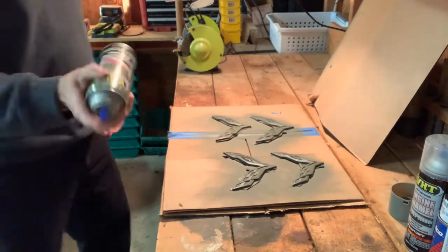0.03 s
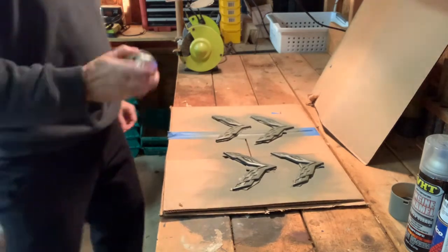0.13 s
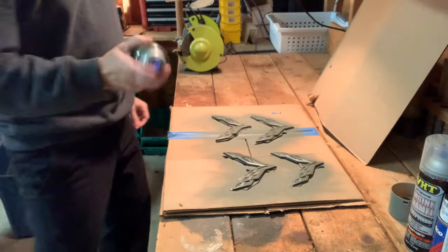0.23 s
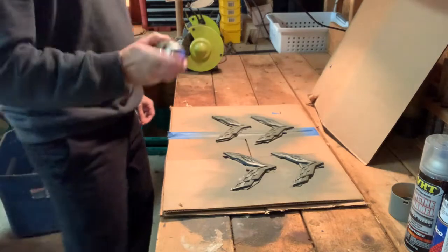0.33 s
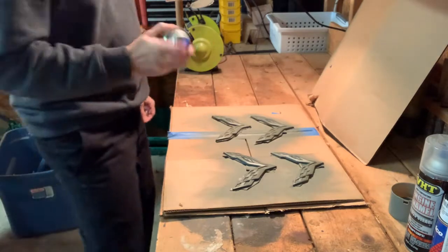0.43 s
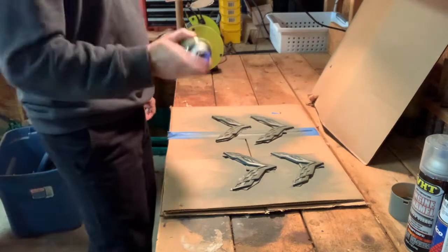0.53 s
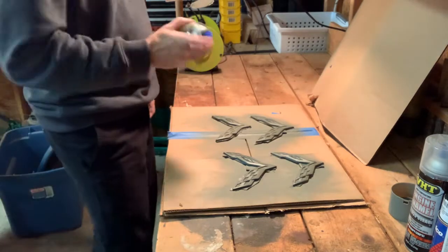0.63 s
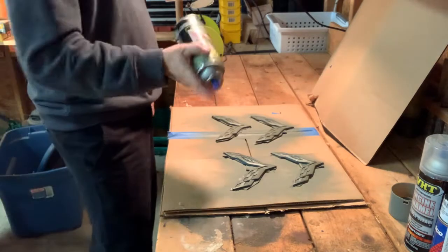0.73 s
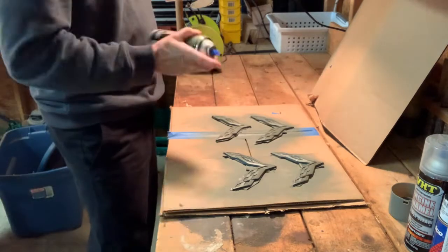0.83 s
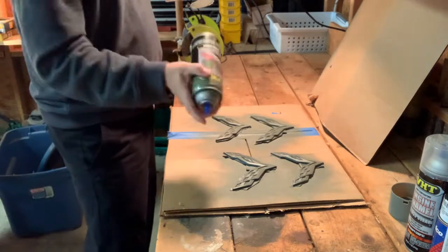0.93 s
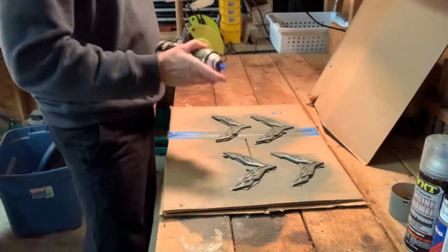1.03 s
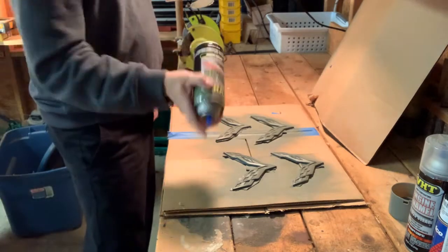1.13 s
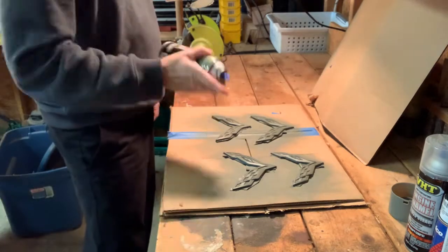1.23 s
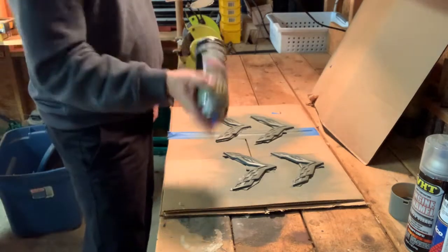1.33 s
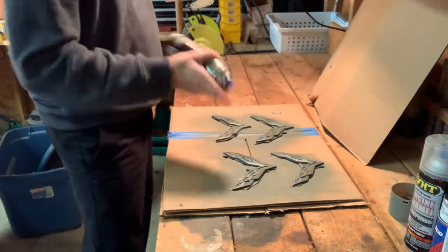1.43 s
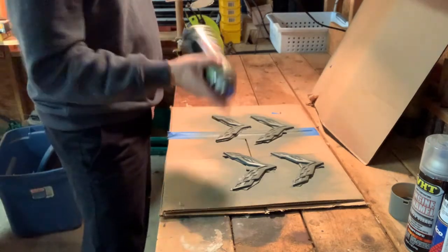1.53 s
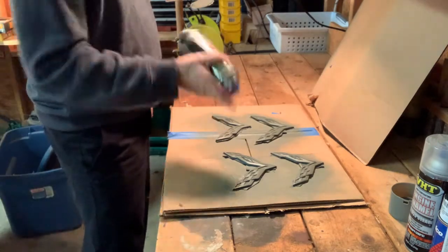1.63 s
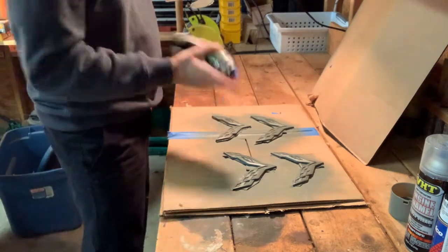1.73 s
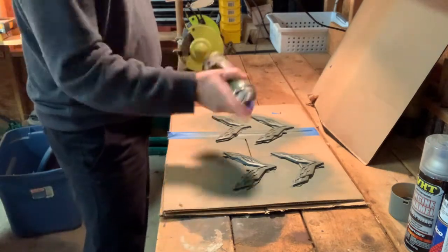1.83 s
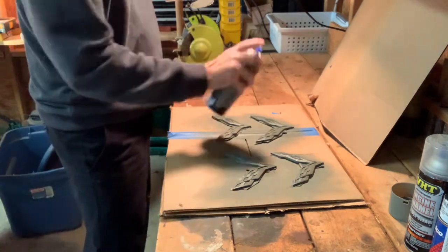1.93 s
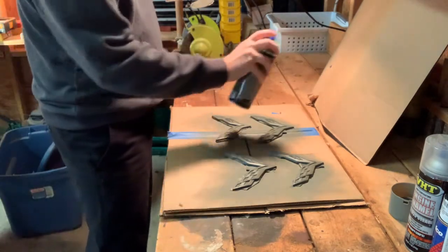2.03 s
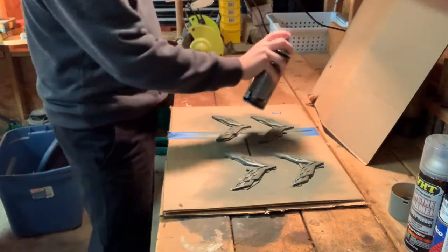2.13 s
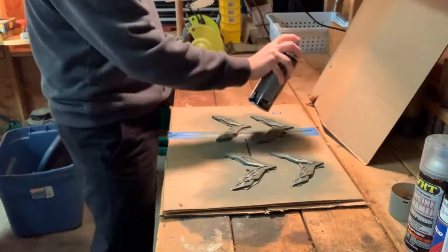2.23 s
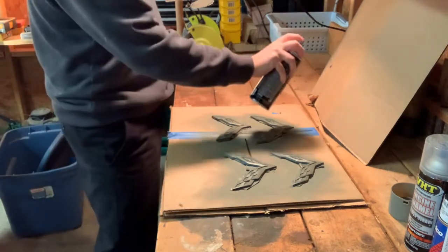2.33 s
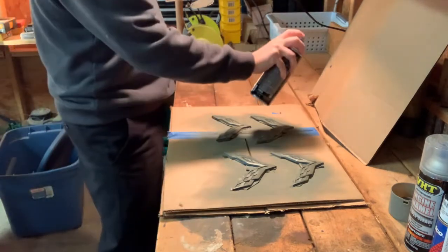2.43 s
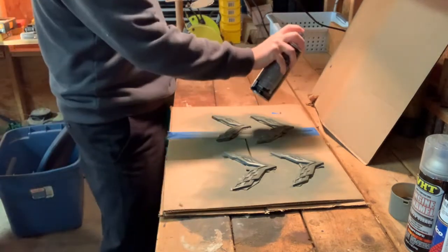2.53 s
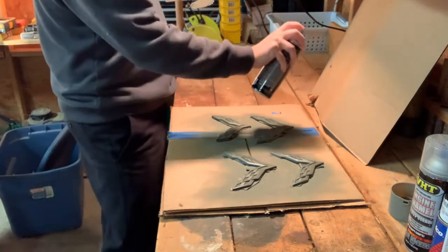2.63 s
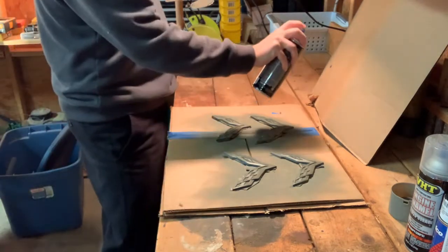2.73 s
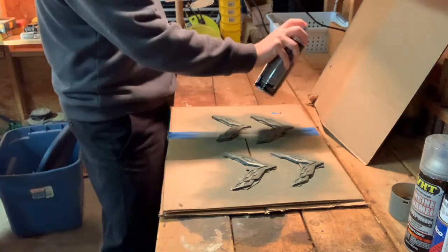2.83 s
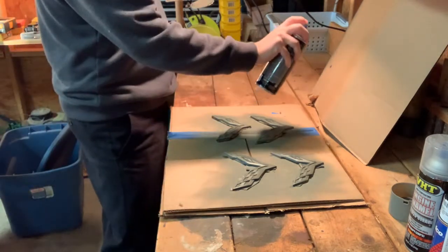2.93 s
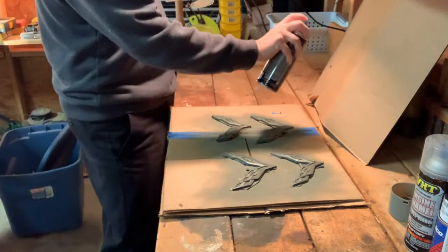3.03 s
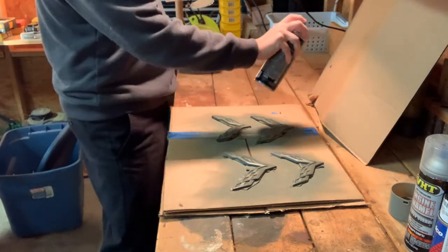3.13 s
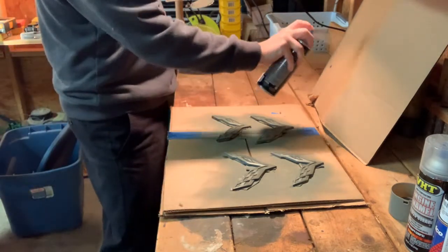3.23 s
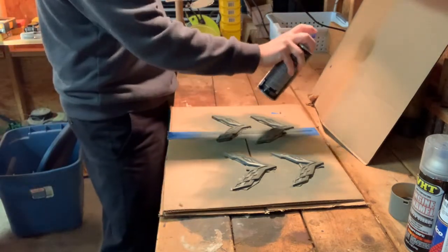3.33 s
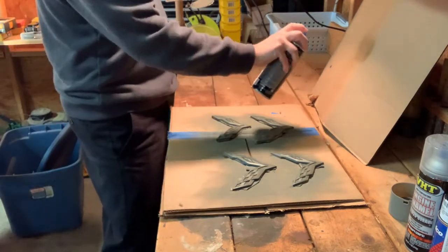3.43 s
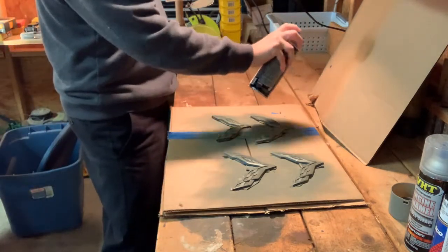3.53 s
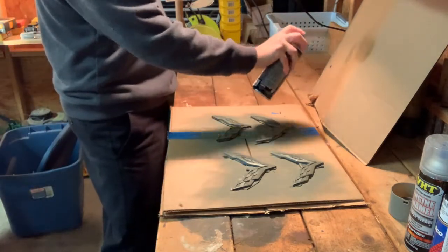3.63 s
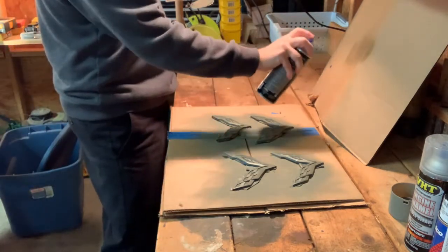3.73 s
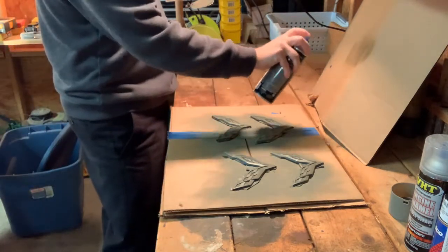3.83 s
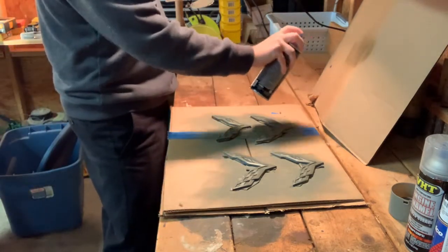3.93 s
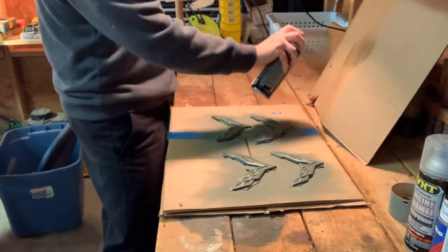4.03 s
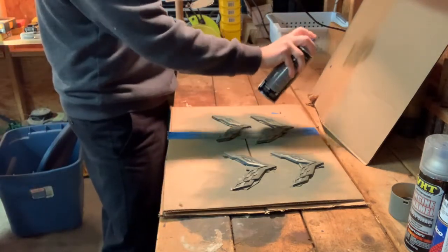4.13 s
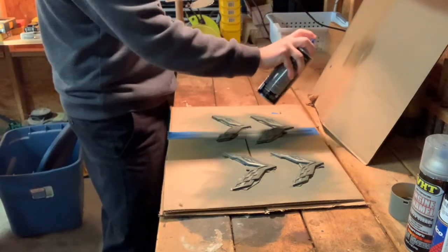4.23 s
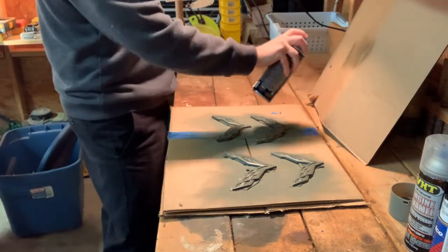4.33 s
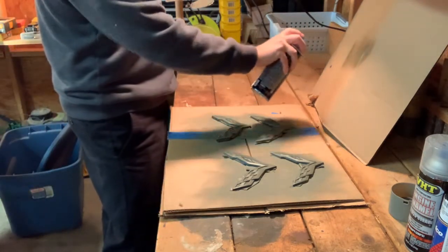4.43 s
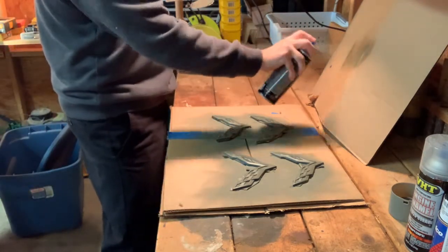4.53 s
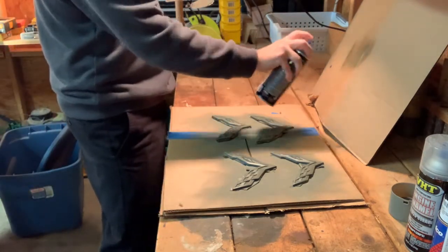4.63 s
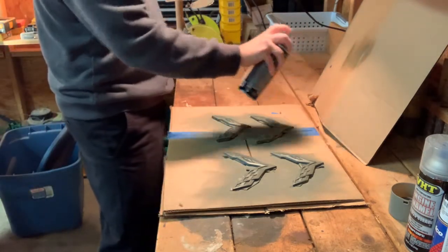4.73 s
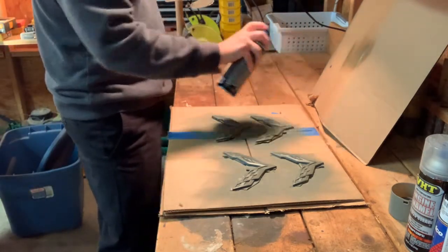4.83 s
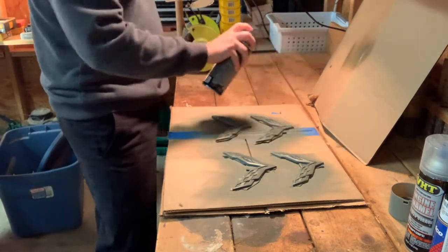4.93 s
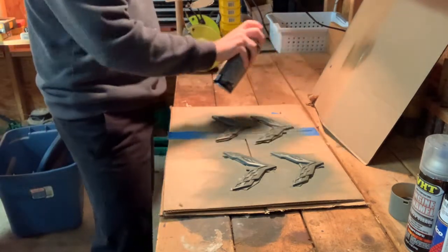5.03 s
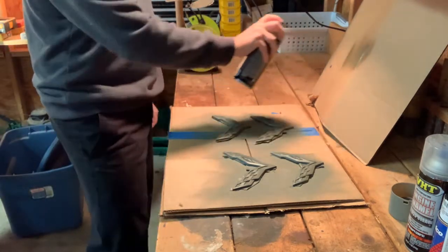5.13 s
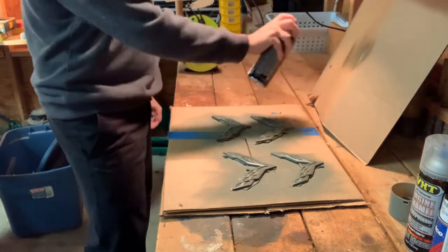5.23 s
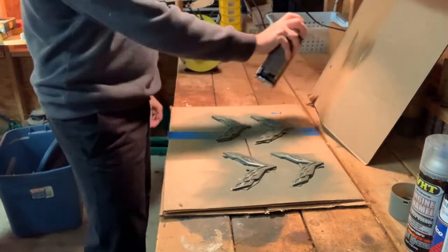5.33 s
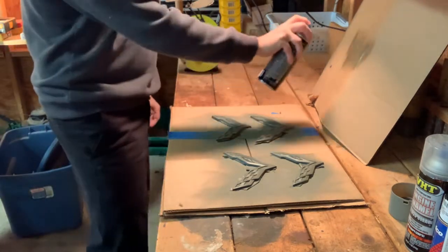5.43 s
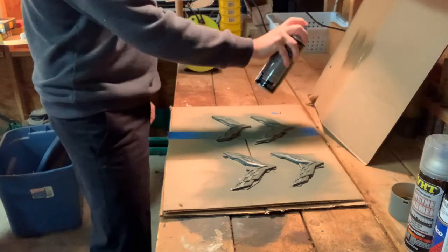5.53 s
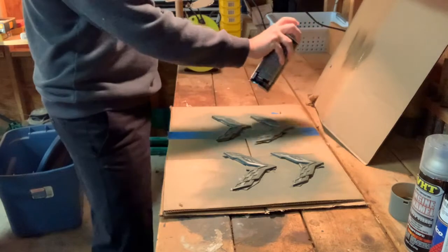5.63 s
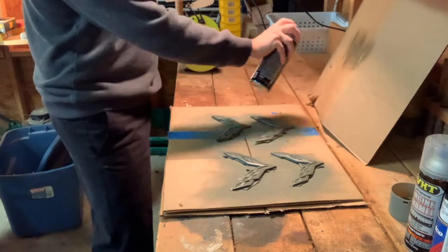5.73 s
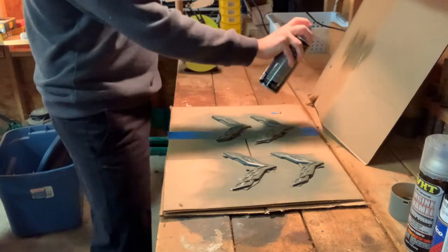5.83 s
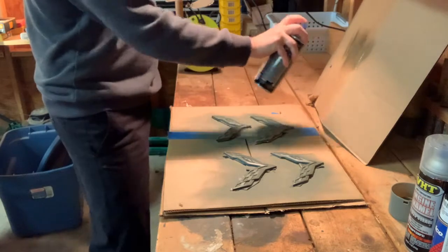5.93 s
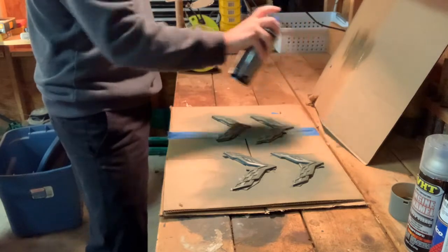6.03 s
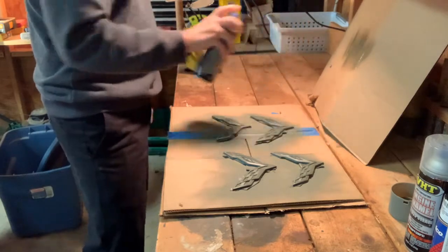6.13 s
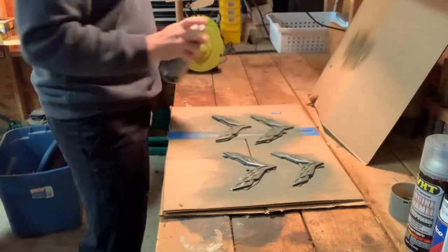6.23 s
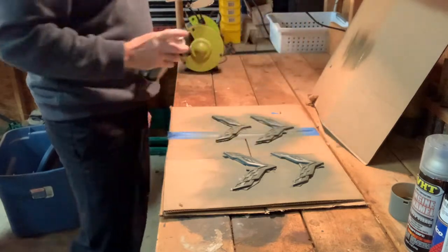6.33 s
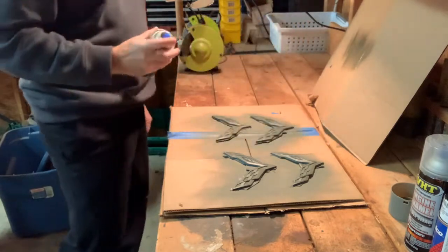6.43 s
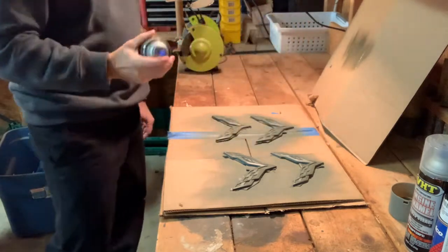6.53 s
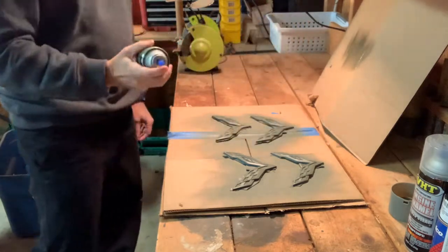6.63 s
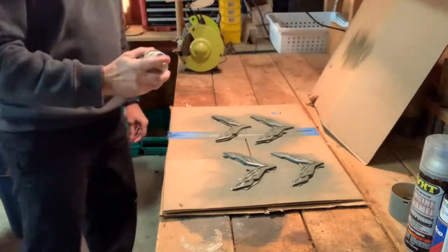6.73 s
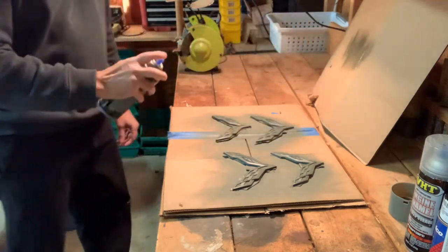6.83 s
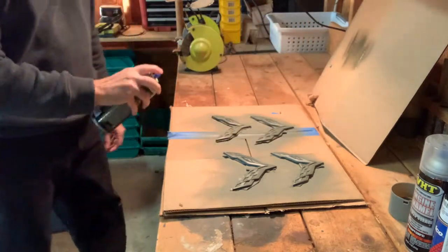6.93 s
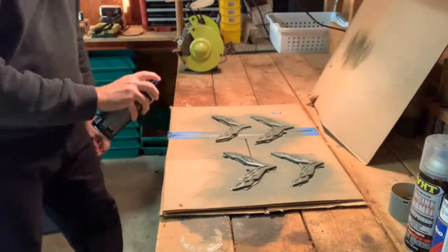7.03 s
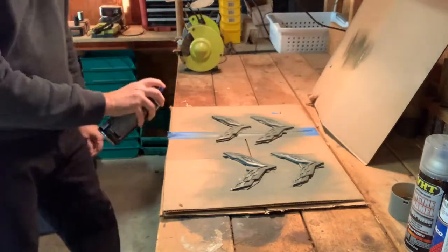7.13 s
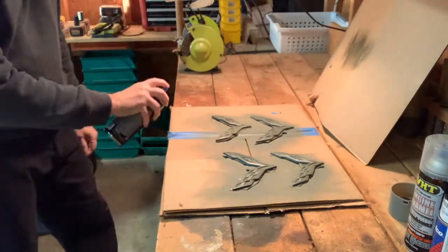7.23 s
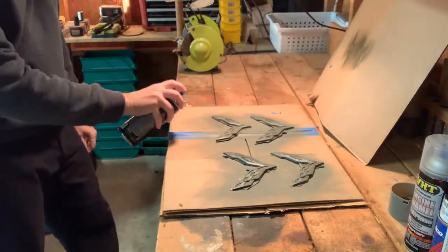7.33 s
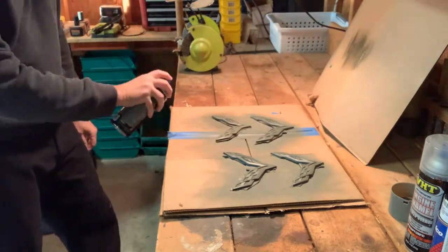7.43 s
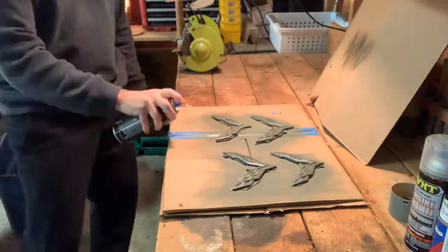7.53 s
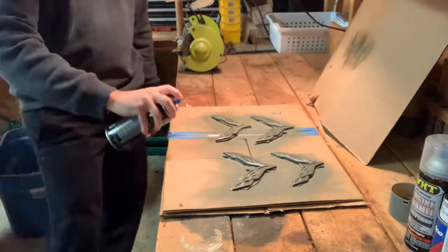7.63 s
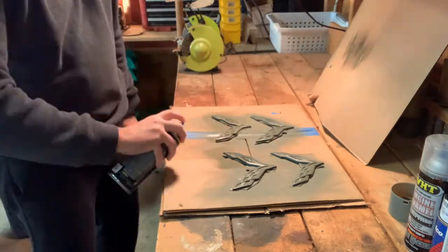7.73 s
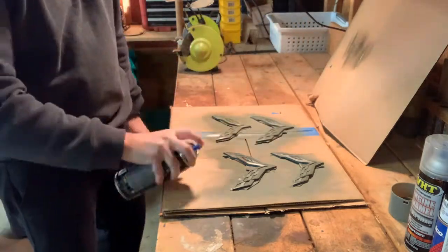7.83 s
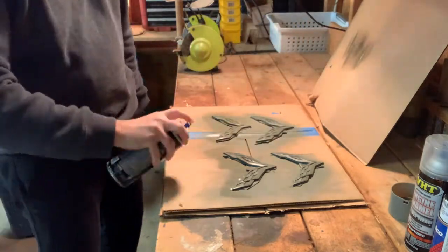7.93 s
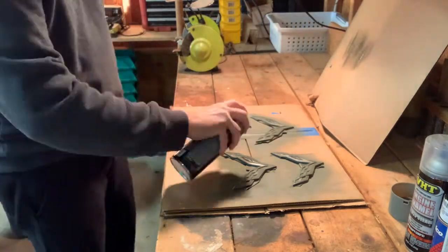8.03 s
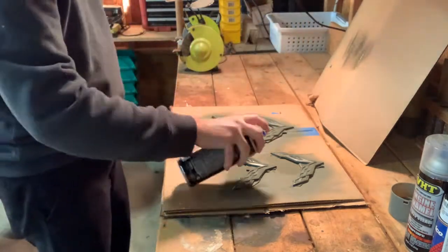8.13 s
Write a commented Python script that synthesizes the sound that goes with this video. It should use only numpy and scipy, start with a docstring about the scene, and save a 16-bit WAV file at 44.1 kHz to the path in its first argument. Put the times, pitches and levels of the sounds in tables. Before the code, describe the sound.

Loud metallic mixing-ball rattle in a paint can, followed by quiet separate spray bursts in a workshop, ending with fluttery fast-forward puffing.

```python
"""A spray can is shaken at a workbench: a ball knocks on its ends (filtered noise and ringing modes), paint sloshes.
From 3.2 to 5.9 s six bursts of shaped noise hiss through the nozzle, with soft resonant swirls of paint.
At 6.6 s a sleeve brushes by; from 6.7 s the can is tipped, the ball clatters and the paint churns again.
By 7.29 s the bench fades out; short noise puffs over a flutter of rumble follow, like spraying in fast-forward.
Up to there lies a low workshop rumble with mains hum."""
import sys
import numpy as np
from scipy import signal
from scipy.fft import rfft, irfft, next_fast_len
from scipy.io import wavfile
from scipy.ndimage import uniform_filter1d, map_coordinates

SR = 44100
rng = np.random.default_rng(int(sys.argv[2]) if len(sys.argv) > 2 else 0)


def to_wav(s):
    """Save 16-bit WAV."""
    ch = np.atleast_2d(s).T  # columns
    pcm = np.round(np.clip(ch, -1, 1) * 32767)  # PCM
    wavfile.write(sys.argv[1], SR, pcm.astype(np.int16))


N = 360738
T = np.arange(N) / SR


# phase by which the left port trails the right: hz, lag_rad
CAN_PHASE = [(0, 0.87), (900, 1.21), (3800, 0.68), (5300, 1.7), (9000, 3.63), (12500, 5.5), (16000, 8.8)]
# extra ring and crack per dB of wall thud
BASE_DB_PER_WALL_DB, CRACK_DB_PER_WALL_DB = 0.5, 0.24
# dome focus at a square hit; dB gained per dB of blow level above it
FOCUS_DB, FOCUS_DB_PER_DB = 3.5, 0.24


def ball(thud_db=-14.0, base_db=-9.0, crack_db=-3.5, level_db=-1.3, echo_db=-8, room_db=-12):
    """The landing spot splits each blow among wall, base and dome; the moving can varies the echoes."""
    direct, echoes = np.zeros(N), np.zeros((2, N))
    for start_s, blow_db, wall_db, extra_base_db, extra_crack_db, dome_hz in blows():
        wall_share_db = thud_db + wall_db
        base_share_db = base_db + extra_base_db + BASE_DB_PER_WALL_DB * wall_db
        crack_share_db = crack_db + extra_crack_db + CRACK_DB_PER_WALL_DB * wall_db
        shares_db = (wall_share_db, base_share_db, 0, crack_share_db)
        focus_db = FOCUS_DB + FOCUS_DB_PER_DB * (blow_db - SQUARE_HIT_DB)
        blow = knock(level_db + blow_db, dome_hz, shares_db, focus_db)
        add(direct, blow, start_s - LEAD_S)
        add(echoes, reflections(blow, decay_s=.008, treble_db=-4), start_s - LEAD_S)
    return ports(direct, CAN_PHASE, pan_db=-1.5) + undb(echo_db) * echoes + undb(room_db) * room(direct)


# throws against an end of the can, relative levels:
# start_s, landing_db, rebound_after_s, rebound_db, dome_hz (favoured), extra_base_db
STROKES = [(0.0294, -19.5, 0.027, -22, 3910, 2.5), (0.1328, -9.5, 0.029, -24, 4374, -1.5),
           (0.2735, -18.5, 0.0041, -31.5, 4276, 3), (0.3915, -17.5, .004, -32.5, 4500, -11),
           (0.4976, -13.5, .0054, -24, 3750, 3), (0.5629, -10.5, 0.018, -12, 3750, -15.5),
           (0.6575, -22, 0.022, -23.5, 3990, 4), (0.7764, -17.5, 0.016, -9.5, 3450, -1.5),
           (0.9191, -16.5, 0.0027, -17.5, 4126, -0.5), (0.993, -9, 0.017, -11.5, 3550, 5.5),
           (1.093, -15.5, 0.017, -14.5, 4100, 3), (1.1988, -13, .024, -10.5, 3550, 0.5),
           (1.3247, -12, .004, -25.5, 3970, 2.5), (1.4215, -20, 0.014, -8, 3232, 4.5),
           (1.5488, -15, 0.0039, -22, 3980, 1.5), (1.6603, -12.5, 0.02, -16.5, 3650, -3),
           (1.7919, -16, 0.0037, -25.5, 3830, -1), (1.8665, -11.5, 0.021, -17, 3800, 1.5)]
# a soft blow lands nearer the wall: wall_db = WALL_DB_PER_DB * (SQUARE_HIT_DB - level_db)
SQUARE_HIT_DB, WALL_DB_PER_DB = -14.5, 0.4428
# paint cushions the landing: less crack than in later contacts
CUSHION_DB = -4
# skitter: typical gap, first bounce re rebound, loss per bounce
SKITTER_GAP_S, SKITTER_DB, SKITTER_LOSS_DB = 0.009, -17.5, 5
# wall graze in flight: mean delay and spread from the landing, mean level, wall share
GRAZE_S, GRAZE_SPREAD_S, GRAZE_DB, GRAZE_WALL_DB = 0.047, 0.01, -39, 13
# loose ball while the can is swung or tipped, relative levels: start_s, level_db, wall_db; # the faint click at
# 2.6655 s is a finger ticking on the nozzle
TAPS = [(0.3145, -35.5, 19), (0.3703, -34, 12.5), (0.7684, -29, 9), (0.8185, -20, -2.5), (0.9672, -33, 19),
        (1.2181, -14.5, -7.5), (1.2685, -34, 15.5), (1.392, -30.5, 13.5), (1.4536, -24, 0),
        (1.614, -34, 18), (1.6387, -29, 7.5), (1.9608, -39, 21), (2.0377, -24.5, 7), (2.091, -27, 5.5),
        (2.1347, -42, 19.5), (2.1656, -36.5, 15.5), (2.178, -32.5, 5), (2.251, -41, 18.5), (2.2676, -41, 5),
        (2.2798, -35.5, 5.5), (2.35, -40.5, 12), (2.4011, -39, 0), (2.4335, -47, 5), (2.4662, -47.5, 3.5),
        (2.6655, -51.5, -11), (2.8749, -70, -1), (3.0445, -67, 1), (6.391, -76, 10), (6.715, -47.5, 13.5),
        (6.7883, -28.5, -2), (6.7935, -30.5, -6), (6.832, -49.5, 13), (6.8443, -37.5, -1), (6.863, -44, -2),
        (6.8964, -29.5, -4.5), (6.9452, -38, -2), (6.977, -40.5, -2.5), (7.0573, -53, 1)]
# dome resonance favoured by a tap; relative spread
TAP_HZ, TAP_SPREAD = 3700, 0.05


def blows(count=2):
    """Thrown ball lands, rebounds, skitters and grazes; a loose ball taps.

    Rows: start_s, level_db, wall_db, extra_base_db, extra_crack_db, dome_hz."""
    rows = []
    for start_s, landing_db, gap_s, rebound_db, dome_hz, base_db in STROKES:
        hits = [(start_s, landing_db, CUSHION_DB), (start_s + gap_s, rebound_db, 0)]
        for k in range(count):
            next_s = hits[-1][0] + SKITTER_GAP_S * np.exp(.3 * rng.standard_normal())
            hits.append((next_s, rebound_db + SKITTER_DB - k * SKITTER_LOSS_DB, 0))
        for hit_s, level_db, crack_db in hits:
            wall_db = WALL_DB_PER_DB * (SQUARE_HIT_DB - level_db)
            rows.append((hit_s, level_db, wall_db, base_db, crack_db, dome_hz))
        graze_s = start_s + GRAZE_S + GRAZE_SPREAD_S * rng.standard_normal()
        graze_db = GRAZE_DB + 2 * rng.standard_normal()
        rows.append((graze_s, graze_db, GRAZE_WALL_DB, 0, 0, dome_hz))
    for start_s, level_db, wall_db in TAPS:
        dome_hz = TAP_HZ * (1 + TAP_SPREAD * rng.standard_normal())
        rows.append((start_s, level_db, wall_db, 0, 0, dome_hz))
    return rows


# nominal can modes, relative levels: pitch_hz, level_db, t60_s
CAN_MODES = [(306, -22, 0.03), (880, -21.5, 0.093), (1293, -13, 0.028), (1480, -16, .07),
             (1800, -19.5, .06), (2130, -1, 0.031), (2267, -14.5, 0.11), (3250, -9.5, .025),
             (3700, -9.5, 0.023), (3966, -10, .025), (4180, -6.5, .025), (4660, -13.5, 0.031),
             (5800, -17, 0.027), (8344, -16.5, .03)]
# outline of the dense, short steel shell resonances: hz, level_db
SHELL = [(120, -51), (280, -17.5), (650, -20.5), (1200, -6), (1700, -14), (2150, -6), (2650, -17),
         (3400, -3.5), (4100, 0), (4900, -10.5), (7000, -6), (9500, -12.5), (12000, -15.5), (16000, -21)]
# bands of wall, base, dome and contact crack: low_hz, high_hz
REGISTERS = [signal.butter(3, edges_hz, "band", fs=SR, output="sos")
             for edges_hz in [(230, 1750), (1750, 2650), (2650, 5300), (5300, 17000)]]
LEAD_S = .01


def knock(dome_db, dome_hz, shares_db, focus_db, shell_s=.0014, shell_db=12, buzz_db=-21, buzz_s=0.015,
          slide_db=-17, slide_s=0.0026, chatter_db=5):
    """The ball skids on the wall from LEAD_S before landing, rings the can and chatters to rest."""
    t = np.arange(SR // 8) / SR - LEAD_S
    after = np.maximum(t, 0)
    hz, db, t60_s = np.transpose(CAN_MODES)[:, :, None]
    detune, strength, turn_rad = rng.standard_normal((3, len(hz), 1))
    # moving paint loads the steel differently at each blow
    mode_gain = undb(db + 2 * strength - 60 * after / t60_s)
    ring = mode_gain * np.sin(2 * np.pi * (hz * (1 + 0.0069 * detune)) * t + 2 * np.pi * turn_rad)
    rebounds = np.minimum(unit(uniform_filter1d(rng.standard_normal(len(t)), size=90)), 2)
    chatter = undb(buzz_db + chatter_db * rebounds) * np.exp(-after / buzz_s)
    slide = undb(slide_db) * np.exp(-abs(t) / slide_s)
    shell = np.where(t < 0, slide, np.exp(-after / shell_s) + chatter)
    blow = ring.sum(0) * (t > 0) + undb(shell_db) * shell * noise(SHELL, size=len(t))
    # the struck spot favours one dome resonance
    blow = blow + undb(focus_db) * signal.lfilter(*signal.iirpeak(dome_hz, 5.5, fs=SR), blow)
    contact = abs(t - .0018) < .0022
    out = np.zeros(len(t))
    for sos, share_db in zip(REGISTERS, shares_db):
        part = signal.sosfilt(sos, blow)
        out += part * undb(dome_db + share_db) / part[contact].std()
    return out


# paint churning, one list while shaken, one while tipped, relative levels: time_s, level_db
CHURN = [
    [(0, -34), (0.3, -45), (0.55, -43), (1.82, -42), (2.12, -53), (2.3, -48.5), (2.45, -55.5), (2.56, -73)],
    [(6.68, -74.5), (6.81, -62), (6.9, -60), (7.01, -67), (7.1, -76)],
]
# splashes heard through the shell: hz, level_db
SPLASH = [(150, -31), (500, -15.5), (900, -4.5), (1500, -2), (2150, 2), (2800, -8), (4100, -0.5),
          (5200, -9.5), (9000, -16.5), (16000, -23.5)]
# splashy hiss of a swirl: hz, level_db
SWIRL_COLOUR = [(400, -10.5), (1200, -1), (2500, -7.5), (4600, -3), (7000, -1.5), (15000, -19)]
# ball and paint fly free before each landing: lead, 1/e half width, dip in churning
LULL_LEAD_S, LULL_HALF_S, LULL_DB = 0.017, 0.041, -3.5
# paint drains in the upright can: swirl pitch climbs to SWIRL_HZ with time constant DRAIN_S
DRAIN_FROM_S, DRAIN_S, SWIRL_HZ, SWIRL_SAG_HZ = 3.29, 0.27, 2000, 480


def paint(churn_db=-3, swirl_db=-4.0, hiss_db=-9, grain=0.7, drops_per_s=1100, base_width_hz=520):
    """Splashes patter on the inside of the shell; gentle swirls hum in base and dome, with a hiss."""
    drop_size = np.exp(grain * np.minimum(rng.standard_normal(N), 2))
    drops = (rng.random(N) < drops_per_s / SR) * rng.standard_normal(N) * drop_size
    lull = sum(swell(start_s - LULL_LEAD_S, LULL_HALF_S) for start_s, *_ in STROKES)
    churn = sum(gain_curve(rows) for rows in CHURN)
    out = unit(colour(drops, SPLASH)) * churn * undb(churn_db + LULL_DB * lull)
    flow = rng.standard_normal(N) * undb(5.4 * walk(60))
    dome = resonance(flow, 3620, width_hz=620)
    hiss = noise(SWIRL_COLOUR) * undb(hiss_db + 2.7 * walk(160))
    for center_s, half_s, level_db, dome_db in swirls():
        sag_hz = SWIRL_SAG_HZ * np.exp(-max(center_s - DRAIN_FROM_S, 0) / DRAIN_S)
        base = resonance(flow, SWIRL_HZ - sag_hz, width_hz=base_width_hz)
        swirl = base + undb(dome_db) * dome + hiss
        out += swell(center_s, half_s) * undb(swirl_db + level_db) * swirl
    return out


# larger turns of the wrist, and from 6.72 to 6.87 s the ball rolling on the can's base, # relative levels:
# center_s, half_s (to 1/e), level_db, dome_db
SWIRLS = [(5.073, 0.074, -63, 1), (6.09, 0.088, -72.5, 3.5), (6.719, 0.012, -43, -20),
          (6.75, 0.008, -47, -16), (6.816, 0.015, -43, -7), (6.865, 0.051, -53.5, -9),
          (7.17, 0.042, -71.5, -6)]
# paint lags the hand at both ends of a sweep; level of the swirl at its start
SWIRL_LAG_S, SWIRL_HALF_S, SWEEP_SWIRL_DB, SWEEP_DOME_DB = 0.051, 0.059, -65, -7


def swirls():
    """Paint inertia: a swirl as each sweep starts and stops, plus the rows of SWIRLS; rows as SWIRLS."""
    rows = list(SWIRLS)
    for start_s, end_s, _, _, turn_db in BURSTS:
        for hand_s, level_db in ((start_s, SWEEP_SWIRL_DB), (end_s, turn_db)):
            rows.append((hand_s + SWIRL_LAG_S, SWIRL_HALF_S, level_db, SWEEP_DOME_DB))
    return rows


# nozzle openings, relative levels: start_s, end_s, jet_db, rush_db (mist on the cardboard),
# turn_db (paint swirl as the hand turns back)
BURSTS = [(3.168, 3.362, -48.5, -53, -63.5), (3.619, 3.847, -50.5, -62.5, -69.5),
          (4.029, 4.287, -49.5, -66, -66), (4.487, 4.66, -49.5, -60, -62.5),
          (5.277, 5.568, -51, -64.5, -81), (5.739, 5.942, -51, -63.5, -64.5)]
# colour of the jet: hz, level_db
JET = [(500, -6.5), (1200, -71), (2100, -11), (3300, -9.5), (4700, -3.5), (6000, -9), (8000, 0),
       (10000, -1), (12800, 4), (16000, 2.5)]
# colour of the mist rush: hz, level_db
RUSH = [(200, -11), (600, -6.5), (1000, -4), (2000, 8.5), (3500, 7), (4700, 9.5), (7000, 7), (14000, -65)]
# phase by which the left port trails the right: hz, lag_rad
JET_PHASE = [(0, 0.7), (2700, 3.92), (6000, 7.98), (9300, 10.7), (13300, 11.8), (16000, 14)]


def spray(open_s=0.022, close_s=0.0045, spit_db=-58, spit_s=0.01, board_db=-7, board_s=0.0014):
    """Turbulent jet hisses, its mist rushes on the cardboard, the closing valve spits."""
    jet, rush = np.zeros((2, N))
    for start_s, end_s, jet_db, rush_db, _ in BURSTS:
        flow = valve(start_s, end_s, open_s, close_s)
        jet += flow * undb(jet_db)
        rush += flow * undb(rush_db) + swell(end_s - .008, spit_s) * undb(spit_db)
    sputter = undb(.8 * walk(500) + .3 * walk(40))
    out = (jet * noise(JET) + rush * noise(RUSH)) * sputter
    # cardboard mirrors the spray; the sweeping hand shifts the ripple in the hiss
    delay_s = board_s * (1 + 0.037 * walk(3))
    return out + undb(board_db) * map_coordinates(out, [(T - delay_s) * SR], order=3)


def valve(start_s, end_s, open_s, close_s):
    """Nozzle flow: linear rise when pressed, exponential fall when let go."""
    return np.clip((T - start_s) / open_s, 0, 1) * np.exp(-np.clip((T - end_s) / close_s, 0, 50))


# equally strong puffs: start_s, end_s
FAST_BURSTS = [(7.367, 7.396), (7.424, 7.447), (7.495, 7.532), (7.557, 7.598), (7.622, 7.651),
               (7.74, 7.772), (7.797, 7.824), (7.866, 7.894), (7.932, 7.966), (8.002, 8.032),
               (8.096, 8.124), (8.154, 8.19)]
# colour of the puffs: hz, level_db
FAST_JET = [(400, -2), (1500, -1.5), (4000, -2), (10000, -2.5), (16000, -4)]
# rumble as if sped up: hz, level_db
FAST_RUMBLE = [(30, -10.5), (150, -22), (300, -10), (450, 7.5), (600, -1.5), (850, 1.5), (1300, -9),
               (2400, -8), (4000, -19), (8000, -30), (16000, -26.5)]
CUT_S = 7.29


def fast_forward(open_s=0.0085, close_s=0.0074, puff_db=-46.0, rumble_db=-59):
    """As if sped up: bursts are brief noise puffs, the rumble sits higher and flutters."""
    flow = undb(puff_db) * sum(valve(start_s, end_s, open_s, close_s) for start_s, end_s in FAST_BURSTS)
    rumble = wide(FAST_RUMBLE, side_db=-3.5) * undb(rumble_db + 1.73 * walk(45))
    fade_in = np.clip((T - CUT_S) / .04, 0, 1) ** 2
    return flow * wide(FAST_JET, side_db=1) + rumble * fade_in


# sleeve brushing past, relative levels: time_s, level_db
SLEEVE = [(6.6, -93), (6.617, -61), (6.645, -60), (6.69, -66), (6.72, -91)]
# colour of the sleeve: hz, level_db
SLEEVE_COLOUR = [(500, -4), (2500, -7.5), (4500, -1), (8000, -3), (12000, -12), (16000, -14)]
# can jolts on the palm or body moves: center_s, half_s (to 1/e), level_db, pitch_hz
BUMPS = [(0.568, 0.011, -39, 295), (0.873, .045, -51, 60), (6.396, 0.063, -62.5, 60.1)]


def handling():
    """Cloth friction is coloured noise; dull bumps are noise through a broad resonance."""
    out = wide(SLEEVE_COLOUR, side_db=2.0) * gain_curve(SLEEVE)
    push = rng.standard_normal(N)
    for center_s, half_s, level_db, pitch_hz in BUMPS:
        thud = resonance(push, pitch_hz, width_hz=0.93 * pitch_hz)
        out += swell(center_s, half_s) * undb(level_db) * thud
    return out


# workshop rumble: hz, level_db
RUMBLE = [(20, -30.5), (40, -7), (60, 1.5), (80, -3.5), (110, 1), (160, -12.5), (290, -9.5), (420, -23),
          (700, -29), (1500, -39.5), (4000, -42), (9000, -49), (16000, -52.5)]
MAINS_HZ = 60


def workshop(rumble_db=-63, hum_db=-71, pan_db=3):
    """Low rumble, mostly alike at both ports in the bass, with diffuse air and a mains sine."""
    hum = np.sqrt(2) * np.sin(2 * np.pi * MAINS_HZ * T) * undb(hum_db)
    side = colour(noise(RUMBLE), [(60, -7.5), (130, -7.0), (500, 0.5)]) * np.array([[1], [-1]])
    rumble = (noise(RUMBLE) + side) * undb(rumble_db + 1.5 * walk(5.026))
    return (rumble + hum) * undb(np.array([[pan_db], [-pan_db]]) / 2)


def reflections(x, decay_s, treble_db):
    """Quick echoes off bench and boards: decaying noise, different at each port."""
    t = np.arange(SR // 12) / SR
    outline = [(1200, 0.46), (4000, 0.94), (14000, treble_db)]
    echoes = colour(rng.standard_normal((2, len(t))), outline) * np.exp(-t / decay_s) * (t > .001)
    return signal.fftconvolve(x[None], unit(echoes) / np.sqrt(len(t)), axes=1)[:, :N]


def room(x, t60_low_s=0.38, t60_high_s=0.21, treble_db=-6):
    """Short tail of a cluttered shop: two noise parts, the treble dying sooner."""
    t = np.arange(SR // 2) / SR
    low, high = rng.standard_normal((2, 2, len(t)))
    low = colour(low, [(100, -9.0), (2500, -6.5), (6000, -16.0), (12000, -27.5)])
    high = colour(high, [(1500, -20.5), (4000, -12.0), (14000, treble_db)])
    tail = low * undb(-60 * t / t60_low_s) + high * undb(-60 * t / t60_high_s)
    tail = unit(tail * np.clip(t / 0.004, 0, 1)) / np.sqrt(len(t))
    return signal.fftconvolve(x[None], tail, axes=1)[:, :N]


def ports(x, phase, pan_db):
    """Two microphone ports; the left one hears the source later."""
    size = next_fast_len(N)
    lag_rad = np.interp(np.fft.rfftfreq(size, 1 / SR), *np.transpose(phase))
    left = irfft(rfft(x, size) * np.exp(-1j * lag_rad), size)[:N]
    return np.array([left * undb(pan_db / 2), x * undb(-pan_db / 2)])


def resonance(x, hz, width_hz):
    """Ring x at one resonance, twice over for steep flanks; rms 1."""
    b, a = signal.iirpeak(hz, hz / width_hz, fs=SR)
    return unit(signal.lfilter(b, a, signal.lfilter(b, a, x)))


def swell(center_s, half_s):
    """Gaussian rise and fall, down to 1/e at half_s."""
    return np.exp(-np.minimum(((T - center_s) / half_s) ** 2, 50))


def wide(points, side_db):
    """Stereo noise of rms 1: a common part and an opposed side part."""
    return unit(noise(points) + undb(side_db) * noise(points) * np.array([[1], [-1]]))


def noise(points, size=N):
    """Coloured noise of rms 1."""
    return unit(colour(rng.standard_normal(size), points))


def colour(x, points):
    """Filter by an outline of hz, level_db."""
    hz, db = np.transpose(points)
    size = next_fast_len(x.shape[-1])
    f = np.maximum(np.fft.rfftfreq(size, 1 / SR), 1)
    gain = undb(np.interp(np.log(f), np.log(hz), db))
    return irfft(rfft(x, size) * gain, size)[..., :x.shape[-1]]


def walk(rate_hz):
    """Slow smoothed chance of rms 1, redrawn rate_hz times a second."""
    k = int(SR / rate_hz)
    steps = np.repeat(rng.standard_normal(N // k + 1), k)
    return unit(uniform_filter1d(uniform_filter1d(steps, k), k)[:N])


def gain_curve(rows):
    """Gain along time_s, level_db points, silent outside them."""
    time_s, db = np.transpose(rows)
    return undb(np.interp(T, time_s, db, left=-200, right=-200))


def undb(db):
    """Decibels to gain."""
    return 10 ** (np.asarray(db) / 20)


def unit(x):
    """Scale to rms 1."""
    return x / np.sqrt(np.mean(x ** 2) + 1e-20)


def add(out, x, start_s):
    """Mix x into out at start_s."""
    i = max(int(start_s * SR), 0)
    out[..., i:i + x.shape[-1]] += x[..., :max(N - i, 0)]


def scene():
    """Everything at the bench fades out by CUT_S, where the fast-forward begins."""
    liquid, jet = paint(), spray()
    slosh = ports(liquid, CAN_PHASE, pan_db=-2.0)
    slosh += undb(-0.5) * reflections(liquid, decay_s=0.014, treble_db=-6.5)
    slosh += undb(-10.0) * room(liquid)
    hiss = ports(jet, JET_PHASE, pan_db=-1)
    hiss += undb(-2.5) * reflections(jet, decay_s=0.0077, treble_db=-1.0)
    hiss += undb(-12) * room(jet)
    fade_out = np.clip((CUT_S - T) / 0.033, 0, 1) ** 2
    return (ball() + slosh + hiss + handling() + workshop()) * fade_out + fast_forward()


TOP_HZ = 16100


def record(dry):
    """Soft saturation rounds the sharpest peaks; a steep low-pass cuts above TOP_HZ."""
    low_pass = signal.ellip(10, .2, 80, TOP_HZ, fs=SR, output="sos")
    return signal.sosfilt(low_pass, np.tanh(dry))


dry = scene()
out = record(dry)
to_wav(out)
```